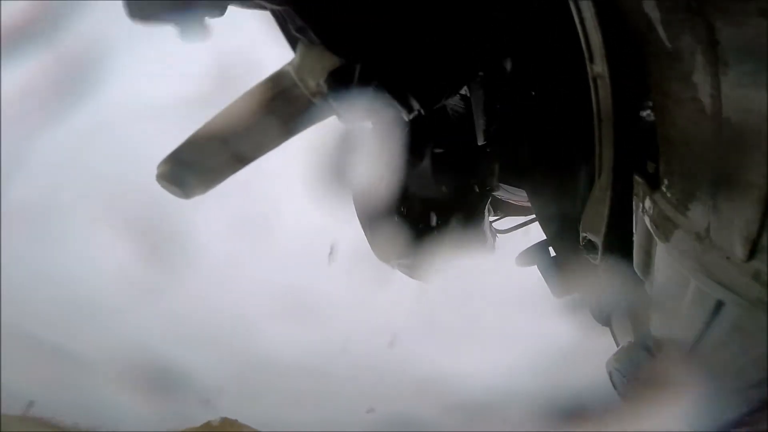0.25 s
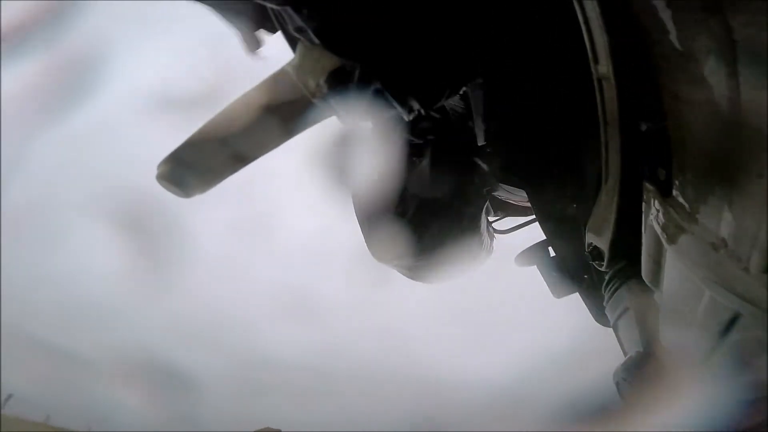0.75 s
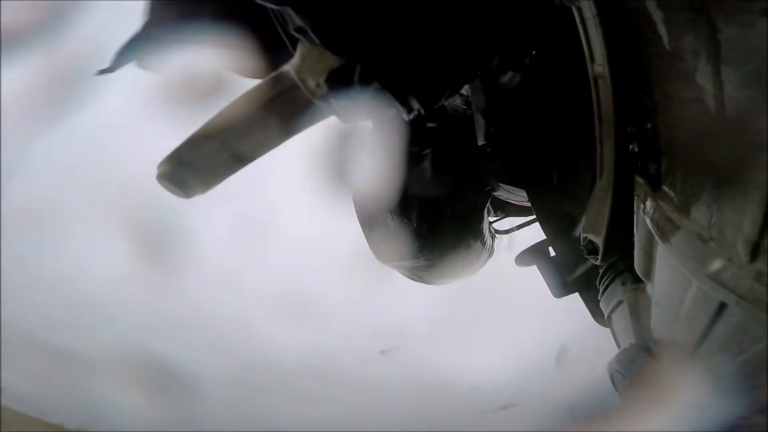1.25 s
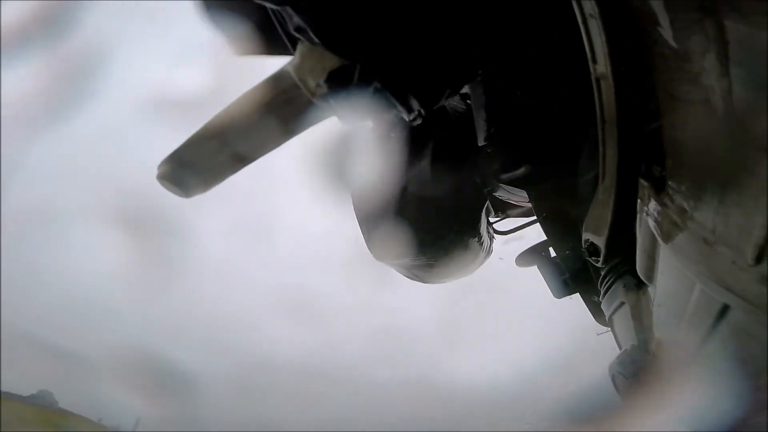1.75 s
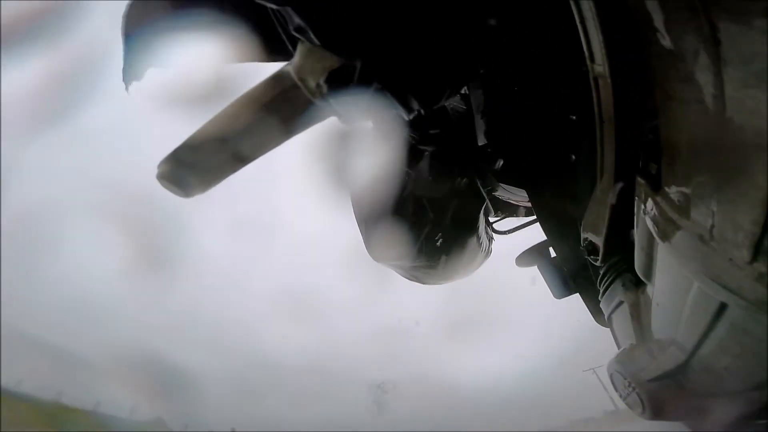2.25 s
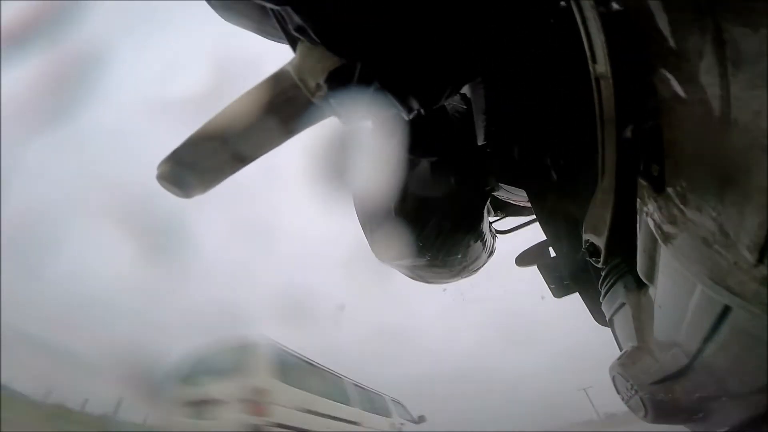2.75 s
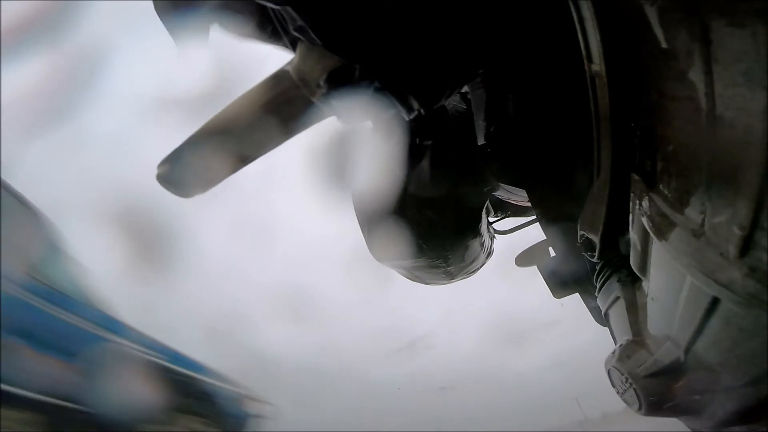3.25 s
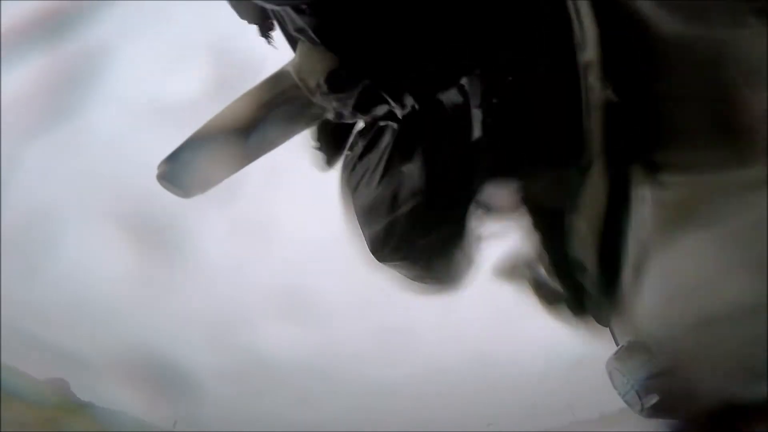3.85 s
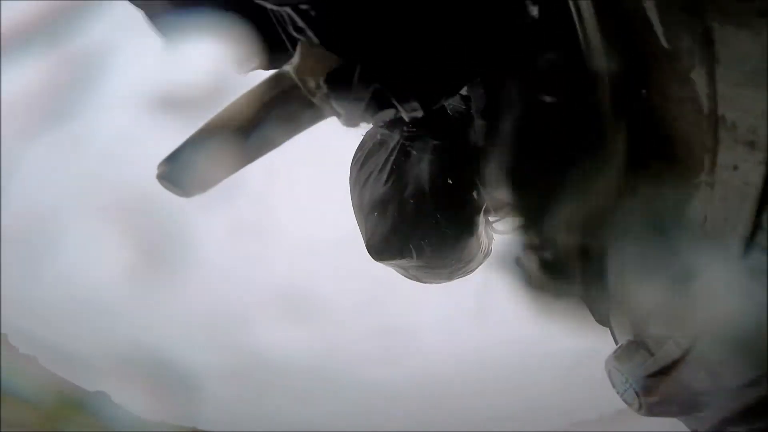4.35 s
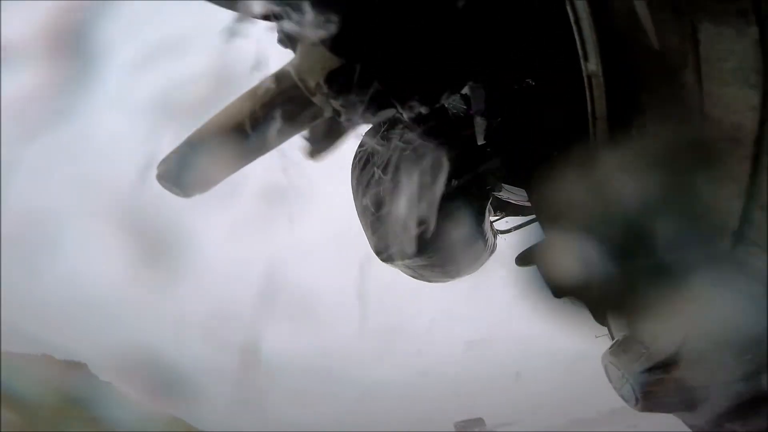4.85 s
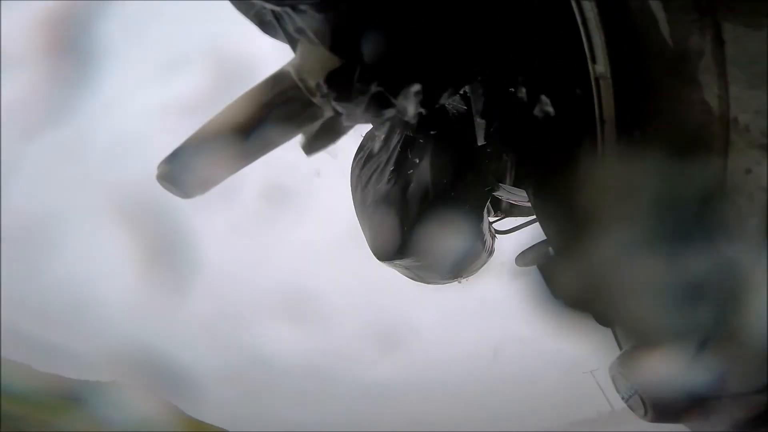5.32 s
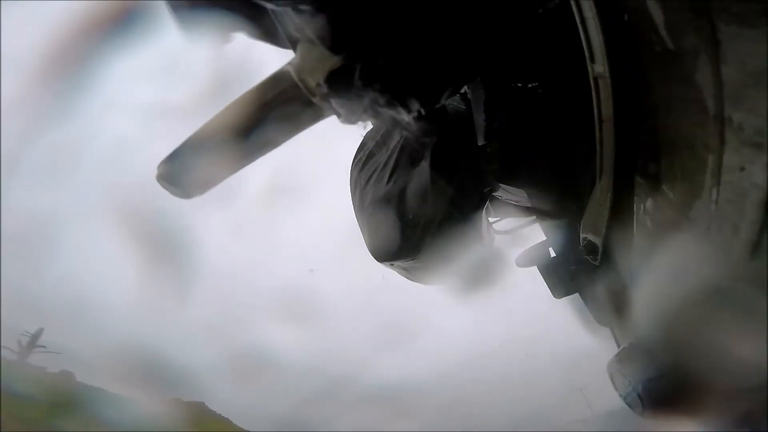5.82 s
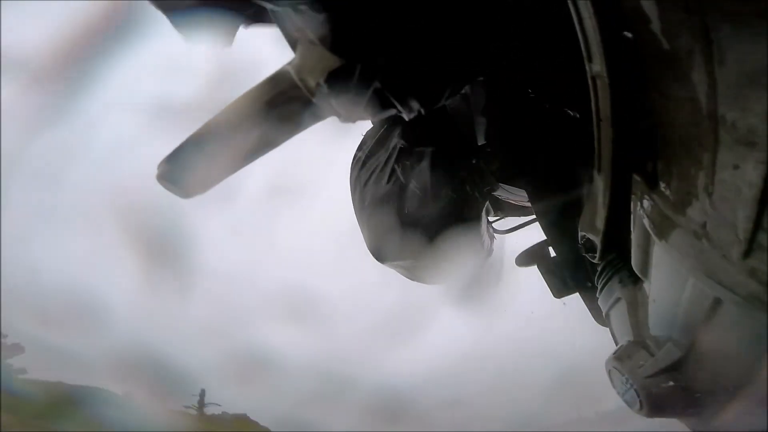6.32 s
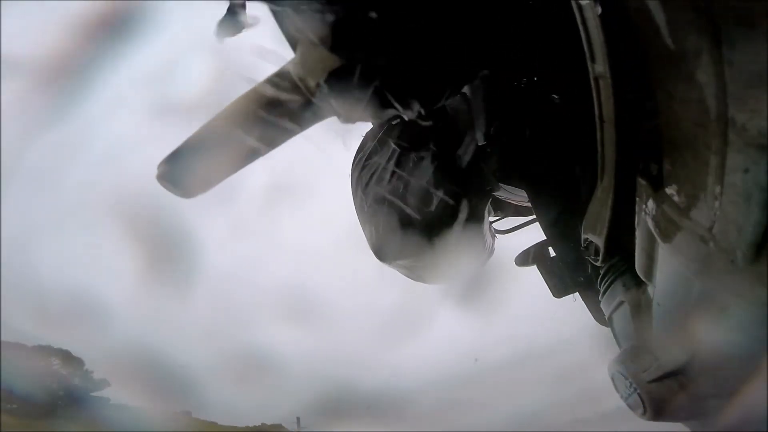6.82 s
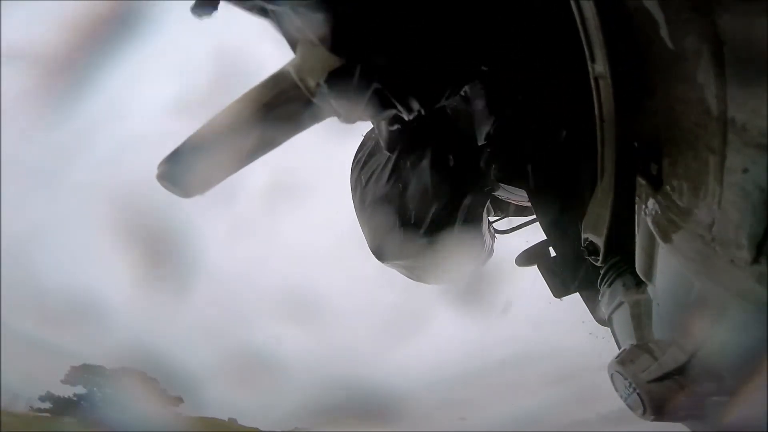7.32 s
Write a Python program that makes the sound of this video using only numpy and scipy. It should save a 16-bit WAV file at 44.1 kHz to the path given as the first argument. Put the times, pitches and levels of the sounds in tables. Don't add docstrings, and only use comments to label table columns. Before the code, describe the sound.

A motorcycle engine drones at steady cruising speed on a wet road, with roaring spray and wind, ticking valves and gear whine, slowly fading.

```python
import sys
import numpy as np
from scipy import signal
from scipy.io import wavfile
from scipy.ndimage import uniform_filter1d

SR = 44100
rng = np.random.default_rng(int(sys.argv[2]) if len(sys.argv) > 2 else 0)


def generate_wav(sig):
    pcm = np.round(np.clip(np.atleast_2d(sig).T, -1, 1) * 32767).astype(np.int16)
    wavfile.write(sys.argv[1], SR, pcm)


def nominal_scale(level):
    x = np.asarray(level, float) / 20
    return 10 ** x


N = 334278
T = np.arange(N) / SR


def evened(x):
    return x / np.sqrt(np.mean(x ** 2) + 1e-20)


def curve(rows):
    times, values = np.transpose(rows)
    return np.interp(T, times, values)


def wander(hz):
    lowpass = signal.butter(2, hz, fs=SR / 64, output="sos")
    coarse = signal.sosfilt(lowpass, rng.standard_normal(N // 64 + 201))[200:]
    return evened(np.interp(np.arange(N) / 64, np.arange(len(coarse)), coarse))


def band_noise(low_hz, high_hz, noise):
    band = signal.butter(2, [low_hz, high_hz], "bandpass", fs=SR, output="sos")
    return signal.sosfilt(band, noise)


def ring(modes, count=1024):
    t = np.arange(count) / SR
    out = np.zeros(count)
    for hz, width_hz, db in modes:
        decay = np.sqrt(width_hz) * np.exp(-np.pi * width_hz * t)
        out += nominal_scale(db) * decay * np.sin(2 * np.pi * hz * t)
    return out


# start_s, level_db
GUSTS = [(0, -2.5), (.2, 0), (.33, -3.5), (.55, 0), (.93, -1.5), (1.06, -1), (1.3, 1), (1.43, -1),
         (1.55, -0.5), (1.7, -.5), (2.1, 1.5), (2.26, -0.5), (2.9, 0), (3.8, -0.5), (4.7, 0.5), (5.3, -.5),
         (6.5, 1), (7.58, 1)]


def gusting():
    return curve(GUSTS)


# pitch_hz, level_db (per Hz)
ROAR_COLOUR = [(30, -19.5), (85, -17.5), (125, -23.5), (250, -20), (500, -22), (710, -21), (1040, -18),
               (1700, -10.5), (1950, -18.5), (2450, -28), (4700, -46.5), (8000, -56), (11500, -61),
               (15500, -60)]
# pitch_hz, width_hz, lift_db
HOUSING = [(350, 60, -14), (843, 159, 9.5), (1150, 147, 8), (1397, 324, 8), (1655, 145, 5), (2726, 96, 7),
           (3530, 900, 3), (4280, 400, 4.5), (5700, 920, 4), (9700, 920, 2.5)]


def roar(patchy_db=0.5, swell_db=0.4):
    frames, hz = N // 512 + 5, np.fft.rfftfreq(2048, 1 / SR)
    real, imaginary, patches = rng.standard_normal((frames, 1025, 3)).T
    patches = uniform_filter1d(patches, 20, 0)
    patches = evened(uniform_filter1d(patches, 6, 1))
    colour_hz, colour_db = np.transpose(ROAR_COLOUR)
    colour = nominal_scale(np.interp(np.log(hz + 1), np.log(colour_hz), colour_db))
    for centre_hz, width_hz, lift_db in HOUSING:
        colour = colour * nominal_scale(lift_db * np.exp(-.5 * (2 * (hz - centre_hz) / width_hz) ** 2))
    spectra = (real + 1j * imaginary) * colour[:, None] * nominal_scale(patchy_db * patches)
    noise = signal.istft(spectra, nperseg=2048, noverlap=1536)[1][:N]
    return evened(noise) * nominal_scale(swell_db * wander(hz=6.4))


def wind(gust_db, level_db=-39.5, follows=0.78, drop_db_per_s=1, lumpy_db=0.3):
    lumpy = rng.standard_normal(N) * nominal_scale(lumpy_db * wander(hz=22))
    return nominal_scale(level_db + follows * gust_db - drop_db_per_s * T) * evened(band_noise(150, 480, lumpy))


# start_s (of the peak), level_db (before the fade), half_length_s
JOLTS = [(.08, -35, .04), (.22, -37, .08), (.55, -44, .07), (.74, -36, .1), (1.01, -40, .04),
         (1.138, -39, .05), (1.43, -38, 0.045), (1.69, -39, .12), (2.09, -31, .04), (2.24, -35, .05),
         (2.4, -38, .1), (2.649, -41, .08), (2.94, -34, .07), (3.33, -33, 0.087), (3.76, -39, .1),
         (3.93, -39, .04), (4.35, -37, .1), (4.54, -36, .04), (4.71, -35, .06), (4.96, -38, .06),
         (5.13, -35, .04), (5.45, -36, 0.14), (5.85, -37, .05), (6.06, -37, .06), (6.48, -33, 0.065),
         (7.08, -39, .05), (7.33, -35, .07)]


def shaking(hum_db=-54.5):
    return nominal_scale(hum_db) + sum(nominal_scale(db) * np.exp(-((T - s) / half_s) ** 2) for s, db, half_s in JOLTS)


def buffeting(hz=49.6, drift_hz=2.7):
    turns = np.cumsum(hz + drift_hz * wander(hz=4.5)) / SR
    return shaking() * np.sqrt(2) * np.sin(2 * np.pi * turns)


# start_s, level_db (peak), pitch_hz
LOUD_TICKS = [(0.0842, -45, 10100), (0.1126, -45, 9670), (0.7562, -45.5, 9680), (0.814, -42.5, 10900),
              (1.0091, -46, 9540), (1.0929, -44, 9500), (1.1209, -49, 9990), (1.2121, -41.5, 10400),
              (1.2331, -46, 9930), (2.1939, -42, 10300), (2.355, -45, 9760), (2.383, -47, 9590),
              (2.4109, -47, 9640), (2.4952, -47, 9840), (2.5232, -40.5, 9630), (2.5516, -48, 9810),
              (2.6633, -47, 10400), (2.7487, -46, 9650), (2.7756, -44, 9550), (2.8579, -47.5, 9520),
              (3.019, -42, 10400), (3.1961, -47, 9780), (3.7848, -48, 9670), (4.2058, -48, 10100),
              (4.3465, -44.5, 9520), (4.3874, -47.5, 11900), (4.6244, -48, 9740), (5.2305, -44, 9510),
              (5.9698, -51, 10400), (7.3412, -48, 10100)]


def loud_ticks(fade, ring_s=.0025, delay_s=.0013, low_ring_s=.002, lid_hz=12100, small_per_s=4, small_db=-53):
    t = np.arange(300) / SR
    small = nominal_scale(small_db) * fade * (rng.random(N) < small_per_s / SR)
    lid = nominal_scale(-60 * t / ring_s) * np.sin(2 * np.pi * lid_hz * t)
    out = signal.oaconvolve(small, nominal_scale(9.5) * lid)
    for s, db, hz in LOUD_TICKS:
        click = nominal_scale(4 - 60 * t / ring_s) * np.sin(2 * np.pi * hz * t)
        low_ring = nominal_scale(1.5 - 60 * t / low_ring_s) * np.sin(np.pi * hz * t)
        out[round((s + delay_s) * SR):][:300] += nominal_scale(db) * (click + low_ring + nominal_scale(-1) * lid)
    return out[:N]


# start_s, speed_hz (engine cycles a second)
SPEED = [(0.0, 35.643), (0.4, 35.764), (0.8, 35.628), (1.2, 35.679), (1.6, 35.643), (2.0, 35.671),
         (2.4, 35.651), (3.2, 35.684), (3.6, 35.675), (4.0, 35.641), (4.4, 35.598), (4.8, 35.643),
         (5.2, 35.507), (5.6, 35.419), (6.4, 35.326), (6.8, 35.185), (7.2, 35.147), (7.58, 35.28)]


def crank():
    return -.084 + np.cumsum(curve(SPEED)) / SR


# order (multiple of the cycle), level_db
GEARS = [(41.14, -7), (82.28, -36)]


def gears(turns, waver_db=1.0, slack_turns=0.013):
    out = np.zeros(N)
    for order, db in GEARS:
        phase = order * turns + slack_turns * wander(hz=2.2)
        out += np.sqrt(2) * nominal_scale(db + waver_db * wander(hz=15)) * np.cos(2 * np.pi * phase)
    return out


# place (0-1 in the cycle), knock_db (casing), tick_db (tappet)
VALVES = [(.05, -7, -9), (.10, -3, -7), (.14, -2, -5), (.195, -4, 0), (.33, -11, -8), (.40, -9, -12),
          (.455, -14, -7), (.57, -4, -8), (.62, -4, -6), (.67, -5, -9), (.705, -8, -5), (.82, -9, -7),
          (.86, -6, -10), (.895, -1, -3), (.915, -3, -6), (.965, -1, 2)]
# pitch_hz, width_hz, level_db
CASING = [(2210, 170, 8), (2837, 460, 6), (3543, 250, 4.3), (4153, 200, -1)]
# pitch_hz, width_hz, level_db
TAPPETS = [(4180, 450, -10), (5230, 300, -12), (5800, 900, -35), (9500, 1600, -16)]


def valves(turns, knock_scatter_db=5.5, tick_scatter_db=7.0, rattle_s=0.00064, tick_s=0.00025):
    cycles = np.arange(int(turns[-1]))
    dull, bright = np.zeros(N), np.zeros(N)
    for place, knock_db, tick_db in VALVES:
        size = np.minimum(rng.exponential(1, len(cycles)), 2.2)
        shift = .005 * rng.standard_normal(len(cycles))
        where = np.interp(cycles + place + shift, turns, np.arange(N)).astype(int)
        dull[where] += nominal_scale(knock_db + knock_scatter_db * size)
        bright[where] += nominal_scale(tick_db + tick_scatter_db * rng.permutation(size))
    t = np.arange(400) / SR
    dull = signal.oaconvolve(dull, np.exp(-t / rattle_s))[:N] * rng.standard_normal(N)
    bright = signal.oaconvolve(bright, np.exp(-t / tick_s))[:N] * rng.standard_normal(N)
    bright = np.convolve(bright, [1, 2, 1], "same") / 3
    casing = signal.oaconvolve(dull, ring(CASING))[:N]
    tappets = signal.oaconvolve(bright, ring(TAPPETS))[:N]
    return evened(casing + nominal_scale(6) * tappets)


# start_s, level_db
LOAD = [(0, -1.5), (.2, 0), (.9, 0), (1.15, 1.5), (1.45, -0.5), (1.8, 2), (2.85, 0), (2.95, -1.5), (3.1, 0),
        (3.9, 1), (4.35, 1.5), (4.95, 1), (5.13, 4), (5.3, 0), (5.55, 1.5), (6.48, -0.5), (6.75, 2.5),
        (7.58, 1.5)]


def clatter(turns, level_db=-39, rattle_db=.9, rattle_hz=12):
    frame = signal.butter(4, 10800, fs=SR, output="sos")
    strength = nominal_scale(level_db + curve(LOAD) + rattle_db * wander(rattle_hz))
    return strength * signal.sosfilt(frame, valves(turns))


# start_s (of the middle), level_db (over the usual boom)
ODD_FIRINGS = [(.25, 4), (.57, -3.5), (1.31, -6), (1.95, -6), (2.08, -4), (2.59, -4), (2.63, 3), (2.89, -6),
               (3.33, -3), (3.53, 2.5), (3.7, 2.5), (4.64, -4), (5.07, -6), (5.2, -3), (5.25, 3),
               (5.38, -7), (5.48, -4), (5.68, -4.5), (5.86, -5.5), (6.17, -5), (6.29, -3), (6.43, -6),
               (6.6, -3), (6.73, -6), (6.83, -6), (6.94, -7), (7.01, -8), (7.15, -6), (7.27, -8),
               (7.49, -6)]


def firing_db(length_s=.025):
    return sum(db * np.exp(-((T - s) / length_s) ** 2) for s, db in ODD_FIRINGS)


# order (multiple of the cycle), level_db
EXHAUST = [(1, -41), (2, -37), (3, -17), (4, 0), (5, -7), (6, -12), (7, -15), (9, -28), (10, -30),
           (11, -28), (16, -26), (19, -24), (21, -21), (22, -21), (24, -17), (25, -25), (26, -19),
           (27, -20), (28, -23), (29, -25), (34, -27), (37, -19), (38, -19), (39, -27), (44, -25),
           (45, -25), (46, -18), (47, -25), (48, -24), (50, -26)]


def exhaust(turns, uneven_db=-0.04, knock_db=0.5, boom_db=-17.5, puff_db=-28.0, waver_db=0.7):
    first, second, second_share = .93, .555, .7
    strength = nominal_scale(uneven_db * wander(hz=30))
    late = turns + .0012 * wander(hz=25)
    broken = nominal_scale(2.5 * wander(hz=7))
    thump, knock = np.zeros(N), np.zeros(N)
    for k in range(1, 51):
        db = dict(EXHAUST).get(k, -31)
        if k <= 10:
            level_db = db + 1 + waver_db * wander(hz=9)
            if k == 4:
                level_db = level_db + firing_db() + .7
            phase = k * turns - .04 * (k - 4)
            phase = phase - .18 * (k > 4.5)
            phase = phase + .1 * (k == 7)
            thump += nominal_scale(level_db) * np.cos(2 * np.pi * phase)
        else:
            pair = np.exp(-2j * np.pi * k * first) + second_share * np.exp(-2j * np.pi * k * second)
            smear = .006 * (k - 23) * abs(k - 23)
            bark = np.cos(2 * np.pi * (k * late - smear) + np.angle(pair))
            knock += nominal_scale(db) * np.roll(broken, 7000 * k) * bark
    flow = sum(np.exp(-((turns - place + 0.025) % 1) / 0.37) for place in (first, second))
    gas = flow * rng.standard_normal(N)
    puff = evened(band_noise(720, 1050, gas))
    boom = evened(band_noise(145, 170, gas))
    note = strength * (thump + nominal_scale(knock_db) * knock) / np.std(thump)
    return note + nominal_scale(puff_db) * puff + nominal_scale(boom_db) * boom


def scene():
    turns = crank()
    gust_db = gusting()
    fade_start_s, silent_at_s = 0.5, 9.23
    fade = np.clip((silent_at_s - T) / (silent_at_s - fade_start_s), 0, 1)
    ride = nominal_scale(-19.5 + gust_db) * (roar() + gears(turns))
    ride += buffeting()
    ride += clatter(turns)
    ride += nominal_scale(-17.5 + 0.1 * wander(hz=6)) * exhaust(turns)
    return (fade * (ride + wind(gust_db)) + loud_ticks(fade))[None]


def roll_off(x):
    return signal.sosfilt(signal.butter(12, 15100, fs=SR, output="sos"), x)


def record(dry):
    microphone = signal.butter(3, 13200, fs=SR, output="sos")
    mix = signal.sosfilt(microphone, dry)
    return roll_off(mix)


dry = scene()
out = record(dry)
generate_wav(out)
```